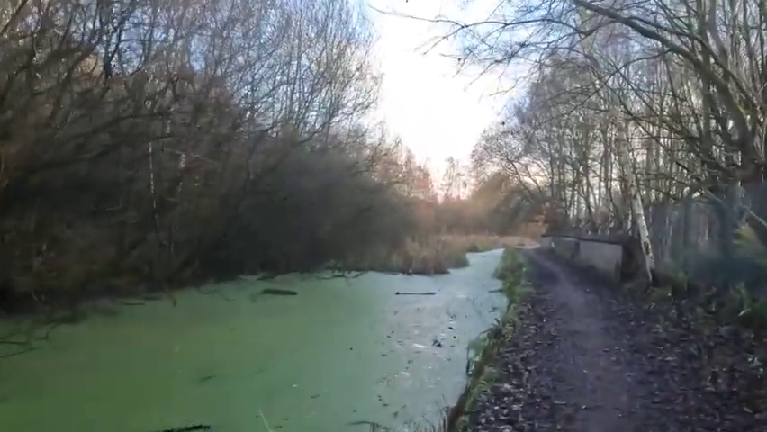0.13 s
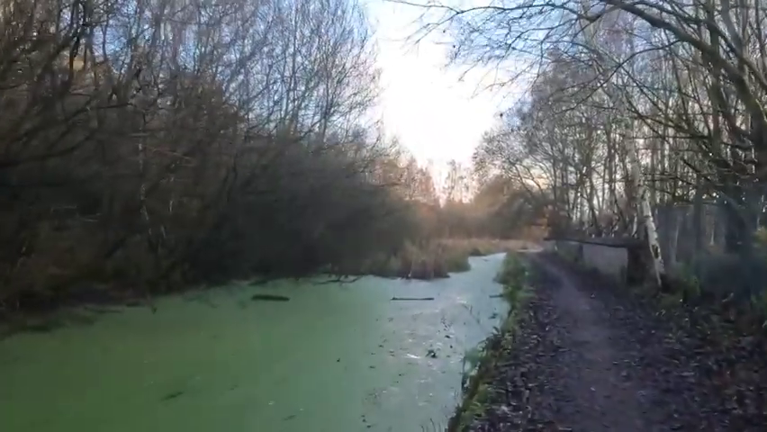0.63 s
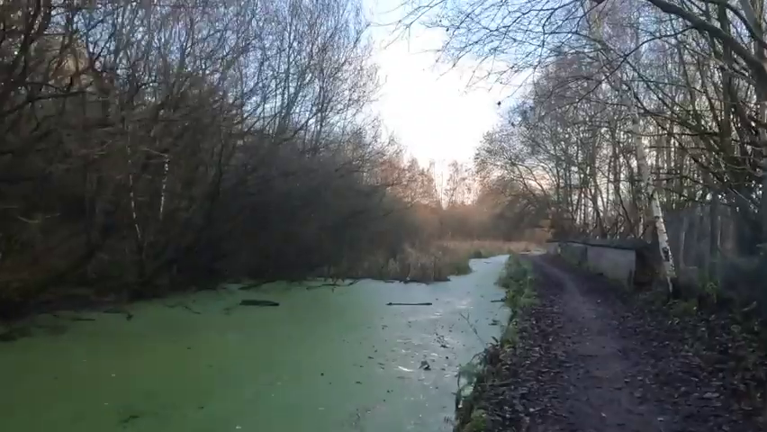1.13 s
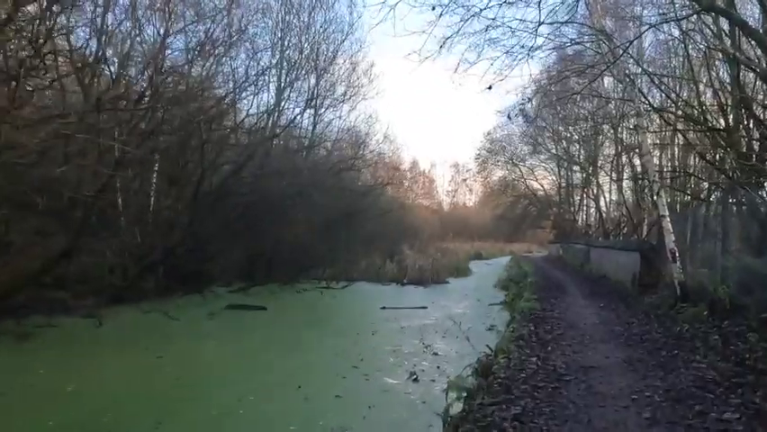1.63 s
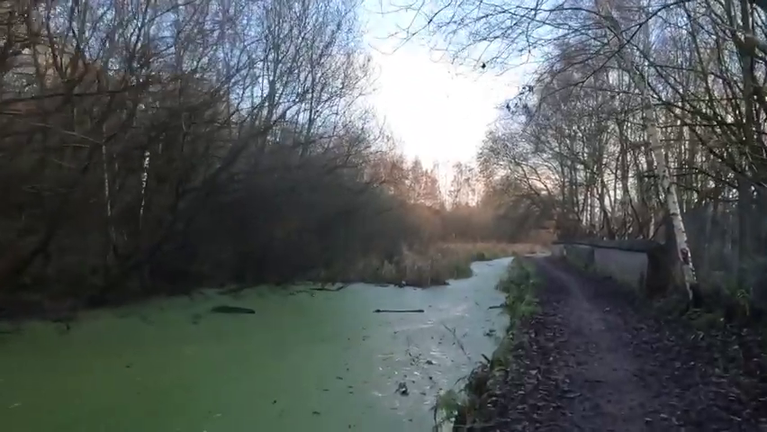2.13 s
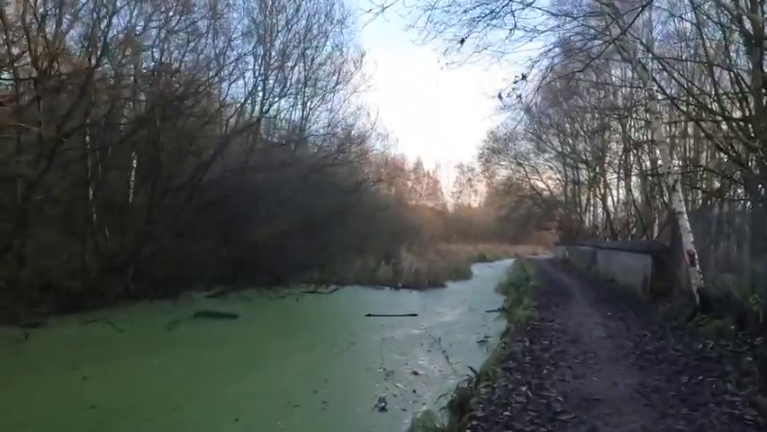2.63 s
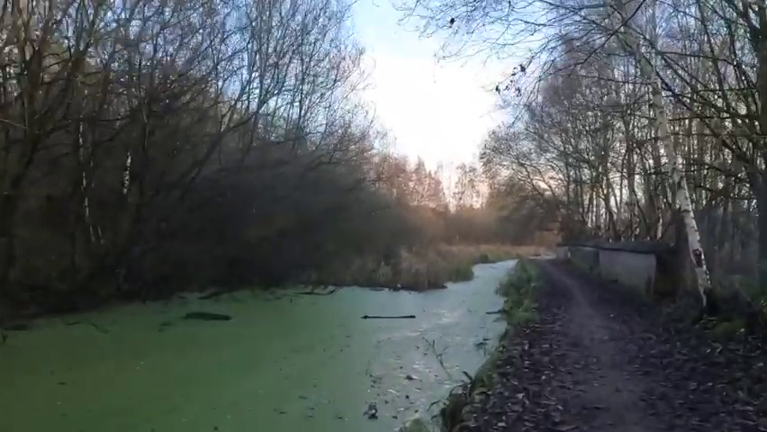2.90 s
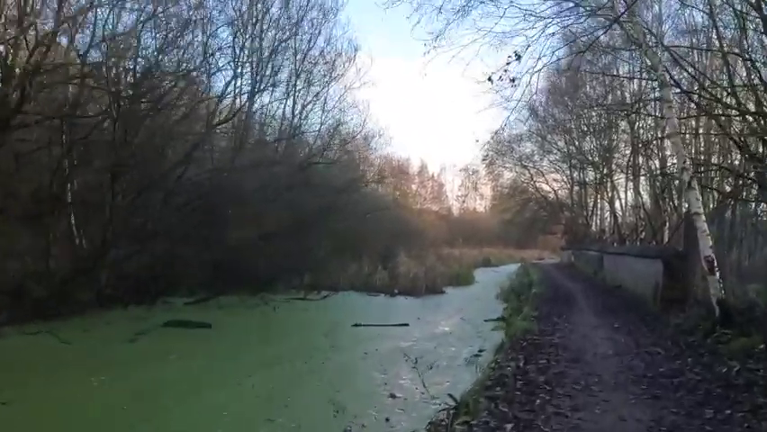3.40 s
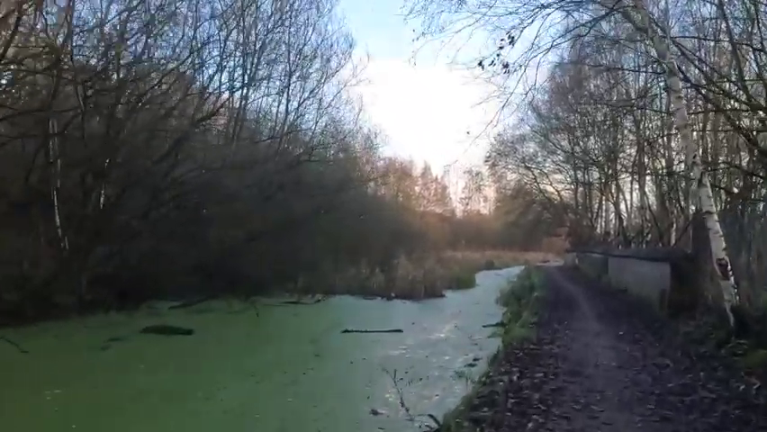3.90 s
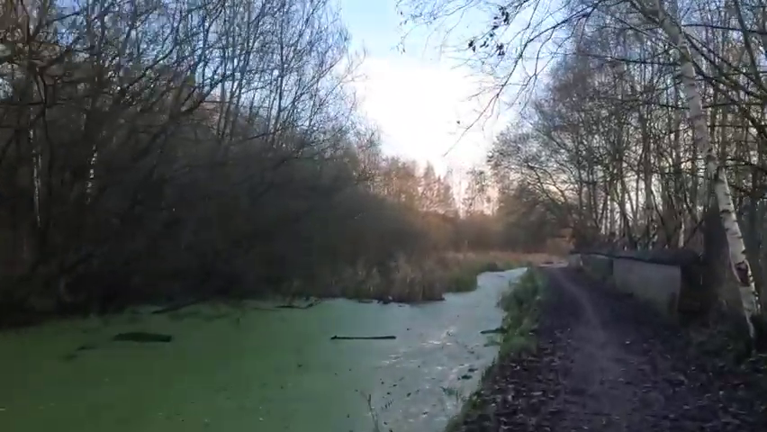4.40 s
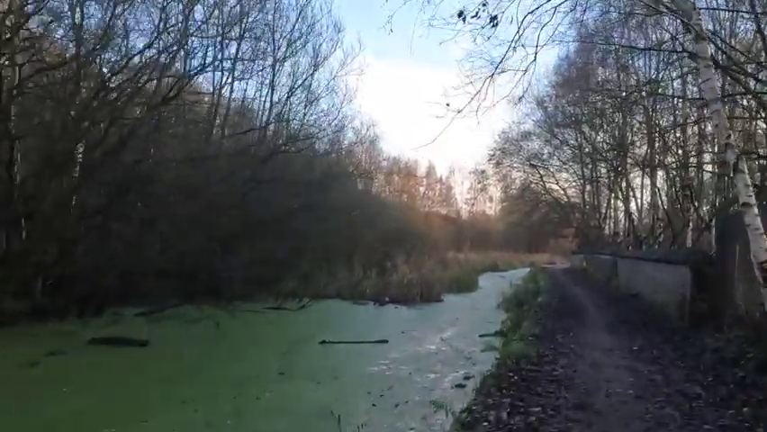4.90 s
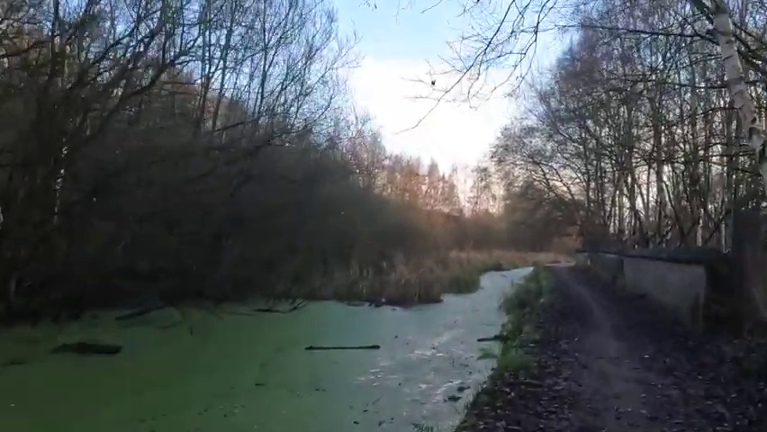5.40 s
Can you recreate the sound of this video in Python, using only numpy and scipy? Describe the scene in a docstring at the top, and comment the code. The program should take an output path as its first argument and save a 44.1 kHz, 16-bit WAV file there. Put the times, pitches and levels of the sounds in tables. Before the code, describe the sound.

A walker moves along a leafy earth path by still water, heard close in stereo. Scuffs of litter come about every half second, with small grit clicks and dry twig snaps; soft heel thuds fall at about 0.9, 2.5, 3.0, 3.6, 4.1 and 4.6 s, the one at 3.0 followed by a brief low boom. Thin, very high falling calls of tiny birds run on the right from 0.4 to 1.7 s, return around 2.5 to 2.9 and grow denser from 3.4 to 4.5. A small bird buzzes and slurs on the left, notably at 0.9, 3.5 and 4.9 to 5.5. A clear whistle on the left stands out at 2.4 and 2.6, fainter elsewhere. Swooping, rising notes right of centre come at 1.2, 2.3 to 2.7 and 3.2 to 3.4. The sharpest snap is at 5.04. Faint traffic hum, air rumble and woodland echo continue throughout.

```python
"""Woodland walk by still water

A walker treads an earth path: sinking sine thuds, one with a low boom just after it, scuffs of leaf-litter
clicks and snaps of filtered noise. Tiny birds buzz and call thinly while two larger birds whistle and swoop,
all warbled near-sines. Sparse random echoes stand for the wood. Far traffic hum and light air rumble at a
stereo camera microphone are shaped noise."""
import sys
import numpy as np
from scipy import signal
from scipy.fft import rfft, irfft
from scipy.io import wavfile
from scipy.ndimage import uniform_filter1d

SR = 44100
rng = np.random.default_rng(int(sys.argv[2]) if len(sys.argv) > 2 else 0)


def rack_gain(trim_db):
    """Turn a fader trim in dB into the linear factor to multiply a signal by."""
    fader = np.asarray(trim_db, float)
    return 10 ** (fader / 20)


def wav_record(signal):
    """Record a signal, one row per channel, as 16-bit PCM in the file named by sys.argv[1]."""
    frames = np.transpose(np.atleast_2d(signal))
    bounded = np.clip(frames, -1, 1)
    # unit amplitude maps onto the largest positive 16-bit level
    quanta = np.round(bounded * 32767).astype(np.int16)
    wavfile.write(sys.argv[1], SR, quanta)


N = 243476


def evened(x):
    """Scales to rms 1."""
    return x / np.sqrt(np.mean(x ** 2) + 1e-20)


def read(points, hz):
    """Looks a curve up on a log-frequency axis."""
    f, value = np.transpose(points)
    return np.interp(np.log(hz + 1), np.log(f + 1), value)


def add(mix, s, sound):
    """Mixes a sound in at time s, cut off at the end of the mix."""
    part = mix[round(s * SR):][:len(sound)]
    part += sound[:len(part)]


def panned(x, lean_db):
    """Places a sound in two channels, the left louder by lean_db."""
    return x * rack_gain([[lean_db / 2], [-lean_db / 2]])


def wood(x, t60, wet_db, swell_s=0.01):
    """Echoes off trunks and bank: sparse taps of random sign swell in, then die by 60 dB in t60 seconds."""
    spacing = 20  # samples, with one tap somewhere in each slot
    taps, t = np.zeros((2, SR // 2)), np.arange(SR // 2) / SR
    slots = np.arange(0, SR // 2 - spacing, spacing)
    places = slots + rng.integers(0, spacing, (2, len(slots)))
    signs = rng.choice([-1., 1.], (2, len(slots)))
    np.put_along_axis(taps, places, signs, 1)
    taps *= rack_gain(-60 * t / t60) * np.minimum(t / swell_s, 1) ** 2
    taps[1] = (taps[0] + 2 * taps[1]) / np.sqrt(5)  # the ports share some of their echoes
    taps /= np.linalg.norm(taps[0])
    return rack_gain(wet_db) * signal.fftconvolve(x[None], taps, axes=1)[:, :N]


def wide_noise(spectrum, patchy_db, size, alike=1):
    """Stereo noise from random short-time spectra with drifting patches, partly alike at both ports."""
    # likeness of the two ports: f/Hz, correlation
    likeness = [(20, 0.76), (60, 1), (180, 0.96), (540, 0.92), (1610, 0.59), (4810, 0.8), (14400, 0.11)]
    # stereo tilt: f/Hz, left minus right/dB
    tilt = [(8, -7), (25, -3), (100, 0.5), (300, -1), (1000, 1.5), (5000, 2.5), (13000, 8.5)]
    frames, hz = N // (size // 4) + 5, np.fft.rfftfreq(size, 1 / SR)
    a, b, c, d, patches = rng.standard_normal((frames, len(hz), 5)).T
    patches = uniform_filter1d(patches, size=12, axis=0)
    patches = evened(uniform_filter1d(patches, size=10, axis=1))
    shared = np.clip(alike * read(likeness, hz), -1, 1)[:, None]
    left = a + 1j * b
    right = shared * left + np.sqrt(1 - shared ** 2) * (c + 1j * d)
    half_tilt_db = read(tilt, hz)[:, None] / 2
    colour = rack_gain(read(spectrum, hz)[:, None] + patchy_db * patches)
    spectra = np.array([left, right]) * colour * rack_gain([half_tilt_db, -half_tilt_db])
    return evened(signal.istft(spectra, nperseg=size, noverlap=size - size // 4)[1][:, :N])


def sung(s, hz, db, warble_hz=0, rate_hz=170, shaky=.3, flutter_db=1.5, overtone_db=-60, edge=0.24):
    """A near sine along a pitch curve, spread into a buzz by an uneven warble; gives start time and tone."""
    t = np.arange(s[0], s[-1], 1 / SR)
    unsteady, flutter = (evened(np.convolve(rng.standard_normal(len(t)), np.hanning(300), "same"))
                         for _ in range(2))
    warble_turn = 2 * np.pi * np.cumsum(rate_hz * (1 + shaky * unsteady)) / SR
    warble = np.sin(rng.random() * 2 * np.pi + warble_turn)
    pitch = np.interp(t, s, hz) + warble_hz * warble
    turn = 2 * np.pi * np.cumsum(pitch) / SR
    level_db = np.interp(t, s, db) + flutter_db * (flutter - warble)  # louder at the bottom of each warble
    octave = rack_gain(overtone_db - abs(pitch - 2050) / 18)  # the beak passes it best for notes near 2050 Hz
    tone = np.sin(turn) + octave * np.sin(2 * turn)
    fade = signal.windows.tukey(len(t), np.clip(edge, 0, 1))
    return s[0], np.sqrt(2) * rack_gain(level_db) * fade * tone


def at_feet(x):
    """Places a footfall just left of centre with the short, quick echo of the path."""
    return panned(x, 1.5) + wood(x, 0.062, -6.5, swell_s=0.0012)


def traffic_hum():
    """Steady hum of far traffic and air: noise with a falling spectrum."""
    # hum spectrum: f/Hz, relative level/dB
    hum_curve = [(55, -19.5), (90, 0), (180, -9), (330, -14), (780, -18.5), (1030, -17.5), (2050, -29.5),
                 (4000, -34), (6200, -40), (7500, -39.5), (8300, -56.5), (12500, -54.5), (14800, -48)]
    return rack_gain(-44.5) * wide_noise(hum_curve, 0.97, size=1024)


def air_rumble():
    """Air rumble at the microphone: lumpy low noise."""
    # rumble spectrum: f/Hz, relative level/dB
    rumble_curve = [(3.5, -31), (6.0, 12), (16, -1.5), (60, -5), (109, -12), (160, -31), (210, -80),
                    (350, -120)]
    return rack_gain(-36.5) * wide_noise(rumble_curve, 0.26, size=4096, alike=0.99)


def thin_callers():
    """Tiny birds further off on the right: short, thin calls that fall in pitch and ring in the wood."""
    # calls: start/s, first f/Hz, first level/dB
    calls = [(0.039, 7500, -90), (.37, 7820, -72), (.54, 7500, -73), (0.711, 7620, -65),
             (0.859, 7460, -63.5), (1.02, 7340, -68), (1.119, 7200, -63.5), (1.24, 7600, -59.5),
             (1.26, 7220, -64), (1.38, 7440, -57), (1.39, 7160, -63), (1.51, 7060, -61.5),
             (1.53, 7360, -59), (1.63, 7170, -60.5), (2.47, 7610, -66.5), (2.6, 7200, -66),
             (2.63, 7570, -69), (2.74, 7120, -64), (2.76, 7700, -71), (2.865, 7050, -69),
             (3.395, 7390, -63.5), (3.445, 7725, -55), (3.605, 7440, -55), (3.7, 7660, -55.5),
             (3.761, 7390, -56.5), (3.84, 7480, -54), (3.96, 7430, -52.5), (4.059, 7440, -55.5),
             (4.18, 7500, -62), (4.195, 7060, -68), (4.311, 7480, -61.5), (4.335, 7000, -66),
             (4.459, 7380, -61), (4.86, 7850, -72), (5.169, 7580, -60), (5.28, 7540, -61)]
    length_s, fall_hz, fade_db = .08, 329, -2.5
    far = np.zeros(N)
    for s, hz, db in calls:
        add(far, *sung([s, s + length_s], [hz, hz - fall_hz], [db, db + fade_db],
                       warble_hz=118, rate_hz=70, shaky=0.36, flutter_db=1.5))
    return panned(far, -3.5) + wood(far, 0.6, -1.2)


def scuffs():
    """Sole drags through litter: each leaf and pebble gives one click, and a few are large."""
    # drags: start/s, level at the crest/dB, length scale/s
    drags = [(0.169, -52.5, 0.032), (0.633, -54.5, 0.13), (1.219, -53, 0.038), (1.703, -57, 0.1),
             (2.28, -51.5, 0.036), (2.77, -57, 0.1), (2.99, -56, 0.14), (3.336, -49, 0.043),
             (3.86, -66, 0.024), (4.11, -59, 0.087), (4.393, -51.5, 0.027), (4.637, -50.5, 0.035),
             (4.88, -54, 0.061), (5.043, -51.5, 0.044), (5.47, -44.5, 0.016)]
    # colour of the litter: f/Hz, relative level/dB
    litter_curve = [(250, -2.5), (900, -1), (2500, -3), (5000, -4.5), (8000, -16.5), (11000, -26),
                    (15000, -36)]
    clicks_per_s = 6000
    drag = np.zeros(N)
    for s, db, length in drags:
        u = np.arange(0, 3 * length, 1 / SR) / (0.4 * length)
        add(drag, s, rack_gain(db) * u * np.exp(1 - u))  # quick bite, slower release
    click_size = rack_gain(2.0 * np.minimum(rng.exponential(1, N), 5)) * (rng.random(N) < clicks_per_s / SR)
    clicks = rng.standard_normal((2, N)) * click_size
    clicks[1] = (clicks[0] + .5 * clicks[1]) / np.sqrt(1.25)  # mostly alike at both ports
    colour = rack_gain(read(litter_curve, np.fft.rfftfreq(N, 1 / SR)))
    crackle = evened(irfft(rfft(clicks) * colour, N)) * drag
    return panned(crackle, 3.1)


def whistler():
    """A larger bird on the left: pure notes slide into a held pitch, with one clear echo off the far bank."""
    # notes: start/s, length/s, held f/Hz, top level/dB, slide into the note/Hz
    notes = [(0.207, 0.092, 4064, -54, -60), (.5, 0.097, 3940, -56.5, -40), (2.368, 0.096, 5265, -35, 673),
             (2.599, 0.093, 4165, -39.5, -300), (4.261, 0.11, 4174, -51.5, -280),
             (4.486, 0.088, 4126, -60.5, -300), (4.707, 0.08, 3990, -62, -200),
             (4.691, 0.08, 5390, -70, 247)]
    slide_s, start_db, crest = .014, -61, .7  # the crest is a share of the length
    bank_s, bank_db = 0.038, -16.5
    whistle = np.zeros(N)
    for s, length, hz, db, slide_hz in notes:
        t = np.arange(0, length, 1 / SR)
        pitch = hz + slide_hz * np.exp(-t / slide_s)
        # notes louder than start_db swell to the crest
        swell_db = db - max(db - start_db, 0) * abs(t / length / crest - 1) ** 1.25
        add(whistle, *sung(s + t, pitch, swell_db, warble_hz=10, rate_hz=37, flutter_db=1.05, edge=0.14))
    add(whistle, bank_s, rack_gain(bank_db) * whistle.copy())
    return panned(whistle, 6.2) + wood(whistle, 0.6, -7, swell_s=0.03)


def buzzing_bird():
    """A tiny near bird on the left: rough falling slurs and wide buzzes, both made by fast warble."""
    # slurs: start/s, first f/Hz, level/dB
    slurs = [(0.226, 7530, -57.5), (2.334, 7430, -59.5), (3.475, 7410, -50), (4.936, 7470, -49),
             (5.082, 7420, -49)]
    # buzzes: start/s, length/s, first centre f/Hz, level/dB
    buzzes = [(0.914, 0.072, 7460, -50), (2.148, 0.089, 7370, -59.5), (3.859, 0.071, 7400, -53),
              (5.403, 0.1, 7350, -49)]
    near = np.zeros(N)
    when = .105 * np.array([0, 0.39, 1])  # s
    fallen = 592 * np.array([0, .6, 1])  # Hz, over half of the fall done by the knee
    for s, hz, db in slurs:
        add(near, *sung(s + when, hz - fallen, [db] * len(when), warble_hz=145,
                        rate_hz=120, shaky=0.45, flutter_db=2.5, edge=0.5))
    sag_hz = 100
    for s, length, hz, db in buzzes:
        add(near, *sung([s, s + length], [hz, hz - sag_hz], [db, db], warble_hz=400,
                        rate_hz=150, shaky=0.89, flutter_db=2.0, edge=0.41))
    return panned(near, 8.8) + wood(near, 0.41, -5.0)


def snaps():
    """Twigs and grit break dry: a tiny puff of noise and tone, coloured by the size of the piece."""
    # snaps: t/s, peak/dB, centre f/Hz
    breaks = [(.42, -43, 2200), (0.6917, -36.5, 5500), (.708, -46, 2800), (.7555, -40, 2200),
              (1.268, -42, 5030), (1.88, -45, 8150), (3.352, -59, 4300), (3.88, -32.5, 1440),
              (4.104, -38, 2460), (4.6442, -32, 2300), (4.646, -36, 680), (4.671, -63, 4800),
              (5.041, -20.5, 2680), (5.0602, -37, 6140), (5.1712, -35, 1700), (5.4768, -37, 6000)]
    cycles = 8.5  # a piece dies by 60 dB within this many swings
    ground, t = np.zeros(N), np.arange(SR // 10) / SR
    for s, db, hz in breaks:
        puff = .6 * rng.standard_normal(len(t)) + np.sin(2 * np.pi * hz * t)
        puff *= rack_gain(-60 * t * hz / cycles)
        band = signal.butter(3, [0.33 * hz, 2 * hz], "band", fs=SR, output="sos")
        puff = signal.sosfilt(band, puff)
        add(ground, s, rack_gain(db) * puff / abs(puff).max())
    return at_feet(ground)


def thuds():
    """Heel meets soft earth: a few cycles sink in pitch while dying by 60 dB in 0.03 s."""
    # thuds: t/s, level at the onset/dB, first f/Hz
    heels = [(0.92, -29.5, 215), (2.5098, -27, 268), (3.043, -30, 220), (3.578, -31.5, 200),
             (4.106, -28, 170), (4.645, -36, 201)]
    ground, t = np.zeros(N), np.arange(SR // 10) / SR
    for s, db, hz in heels:
        add(ground, s, -rack_gain(db - 60 * t / 0.03) * np.sin(2 * np.pi * hz * t * (1 - 9 * t)))
    return at_feet(ground)


def swooper():
    """A larger bird right of centre: notes dip, climb and drop, with an octave, and bounce off the water."""
    # notes: start/s, time to the top/s, top f/Hz, level/dB, length of the climb (1 slow, less is steeper)
    notes = [(1.181, 0.078, 3150, -51.5, 1.02), (1.319, 0.074, 3450, -47, .75),
             (2.3, 0.089, 3243, -49.5, .95), (2.463, 0.065, 3480, -44, .65),
             (2.616, 0.069, 3454, -44.5, .65), (3.199, 0.079, 3175, -47, 1.05),
             (3.343, 0.064, 3640, -46.5, .85)]
    # shape of a note: share of the time to the top, share of the top pitch, relative level/dB
    shape = [(0, 1.75, -10), (.07, 1.0, -5.5), (.18, .7, -20), (.36, .62, -16.5), (.66, .75, -8),
             (.9, .91, 0), (1.0, 1.0, 1.5), (1.1, .99, -2.5), (1.24, 0.53, -9.5)]
    water_s, water_db = .006, -5
    swoop = np.zeros(N)
    when, pitch, level_db = np.transpose(shape)
    climbing = (when > .3) & (when < 1)
    for s, rise, top_hz, db, climb in notes:
        bent = np.where(climbing, 1 - climb * (1 - when), when)
        add(swoop, *sung(s + rise * bent, top_hz * pitch, db + level_db, warble_hz=89.5, rate_hz=200,
                         flutter_db=2.5, overtone_db=4.0, edge=0.049))
    add(swoop, water_s, rack_gain(water_db) * swoop.copy())
    return panned(swoop, -2.0) + wood(swoop, .6, -3, swell_s=.012)


def low_boom():
    """One low boom just after a heel thud: a sine under a half-sine swell, alike in both channels."""
    # the boom: start/s, length/s, f/Hz, peak/dB
    s, length, hz, db = (3.05, 0.1, 56, -26.5)
    boom, t = np.zeros(N), np.arange(0, length, 1 / SR)
    add(boom, s, rack_gain(db) * np.sin(np.pi * t / length) * np.sin(2 * np.pi * hz * t))
    return boom


def scene():
    """All sources at the microphone."""
    background = traffic_hum() + air_rumble()
    birds = thin_callers() + whistler() + buzzing_bird() + swooper()
    walker = scuffs() + snaps() + thuds() + low_boom()
    return background + birds + walker


def top_cut(x):
    """Nothing passes above the cut-off."""
    return signal.sosfilt(signal.butter(12, 14980, fs=SR, output="sos"), x)


def record(dry):
    """The microphone fades above its top edge at 12.5 kHz."""
    dull = signal.sosfilt(signal.butter(4, 12500, fs=SR, output="sos"), dry)
    return top_cut(dull)


dry = scene()
out = record(dry)
wav_record(out)
```